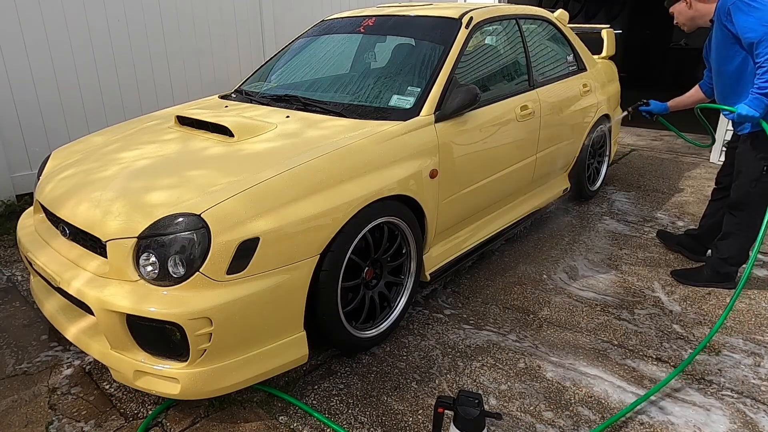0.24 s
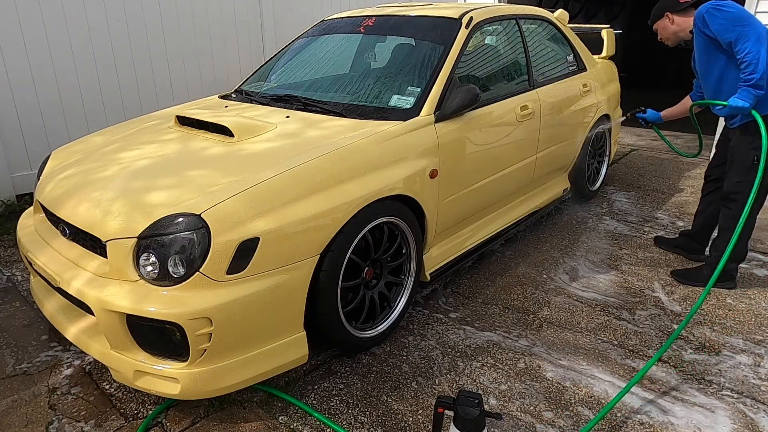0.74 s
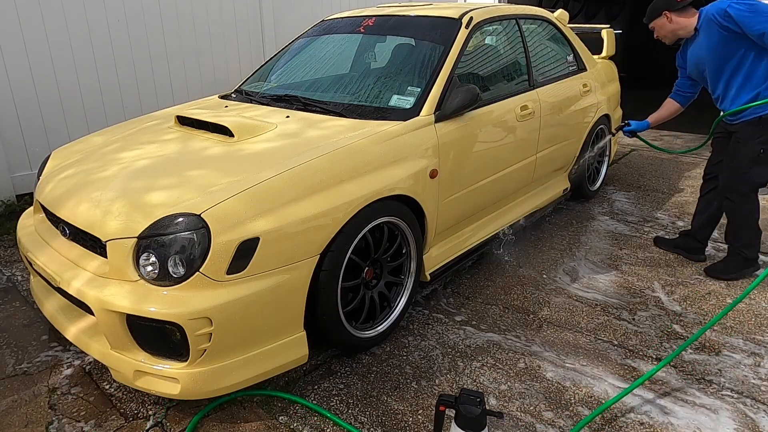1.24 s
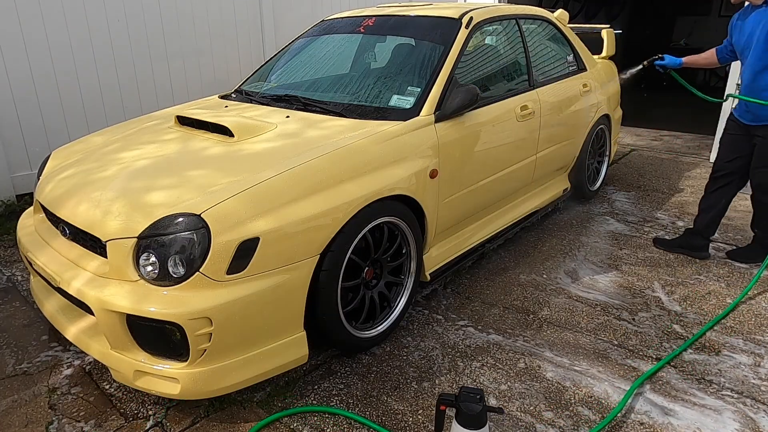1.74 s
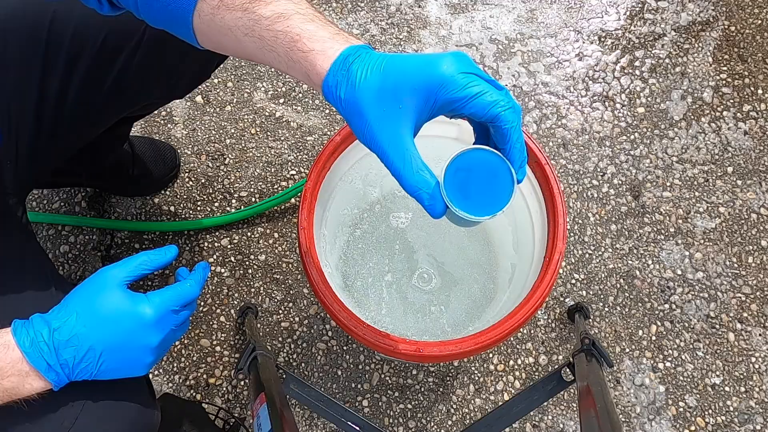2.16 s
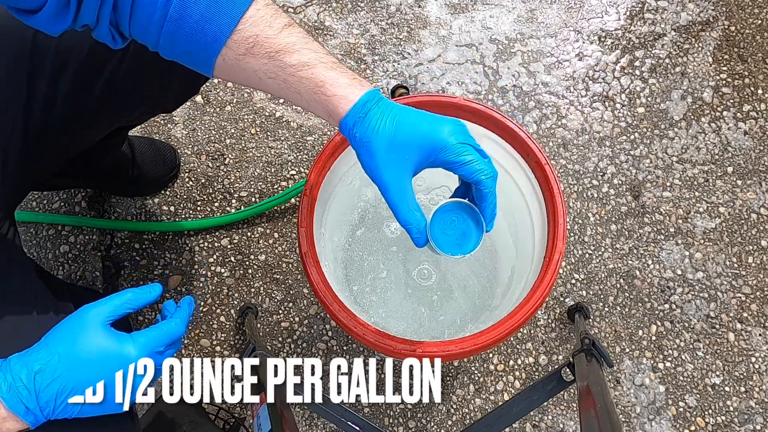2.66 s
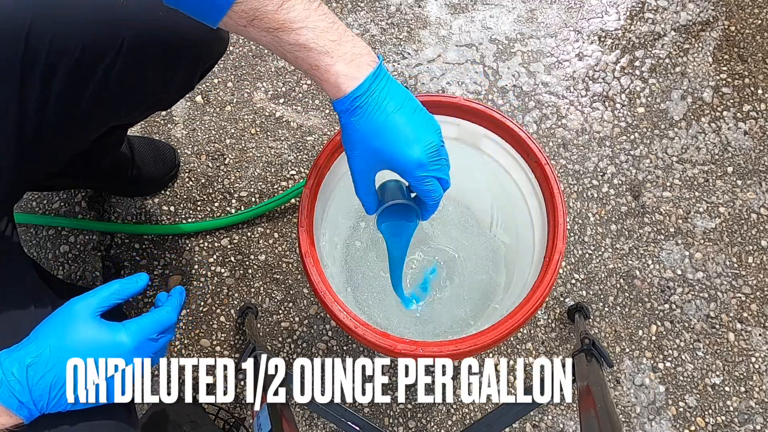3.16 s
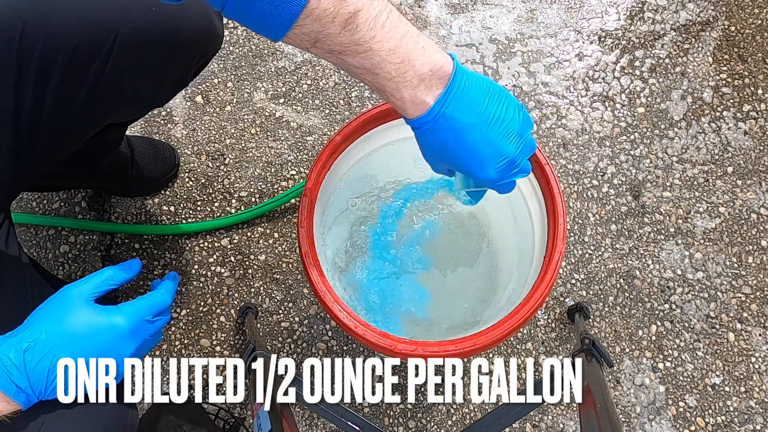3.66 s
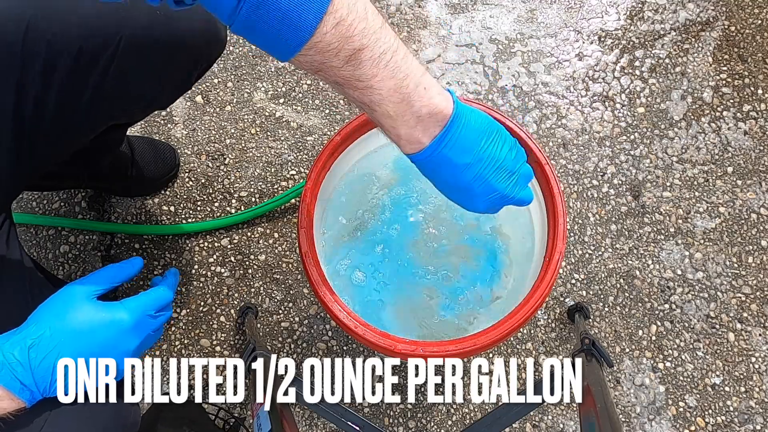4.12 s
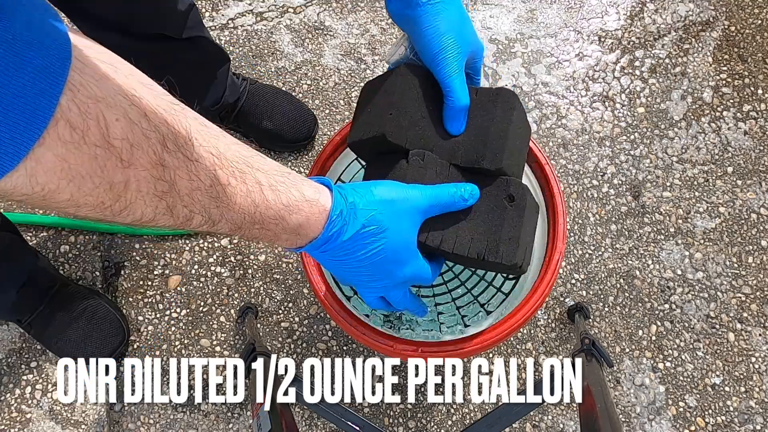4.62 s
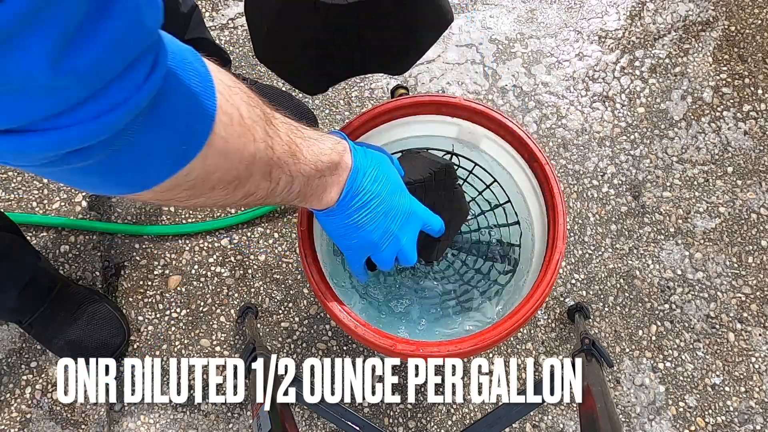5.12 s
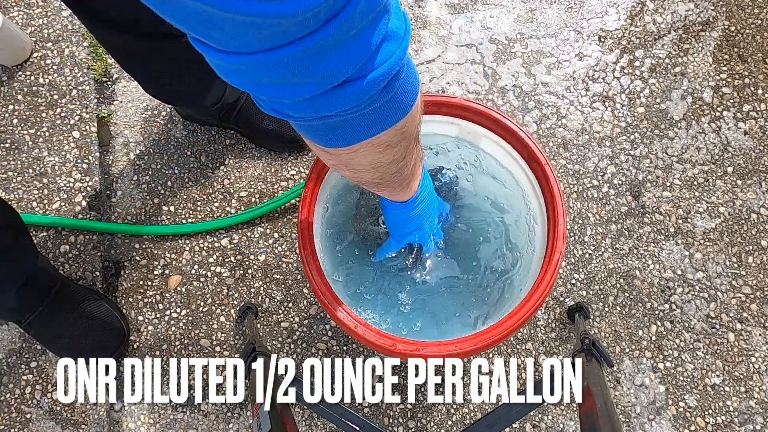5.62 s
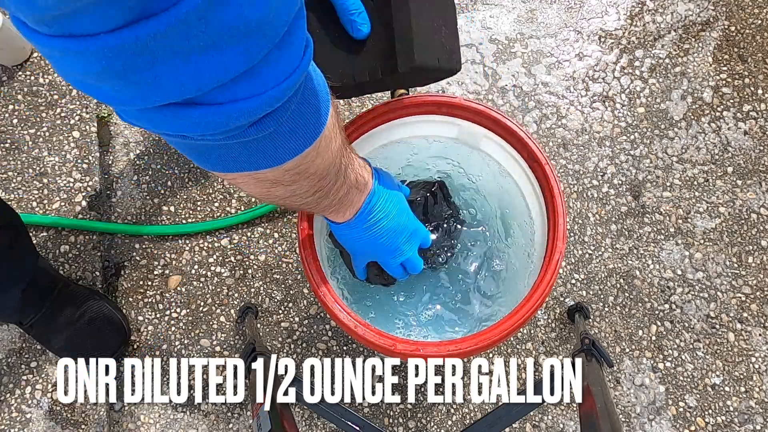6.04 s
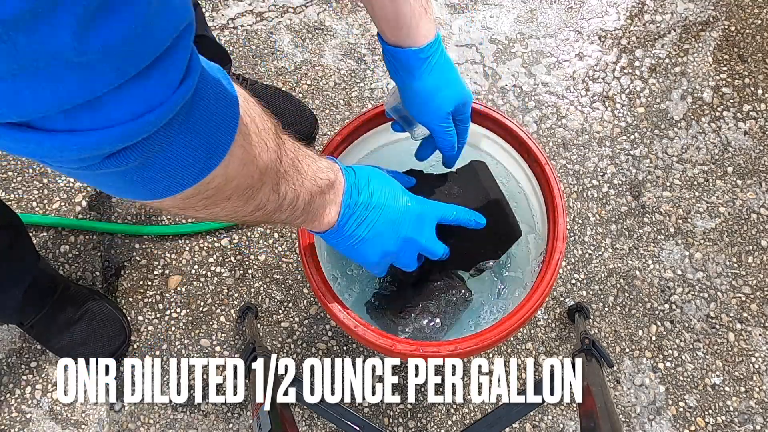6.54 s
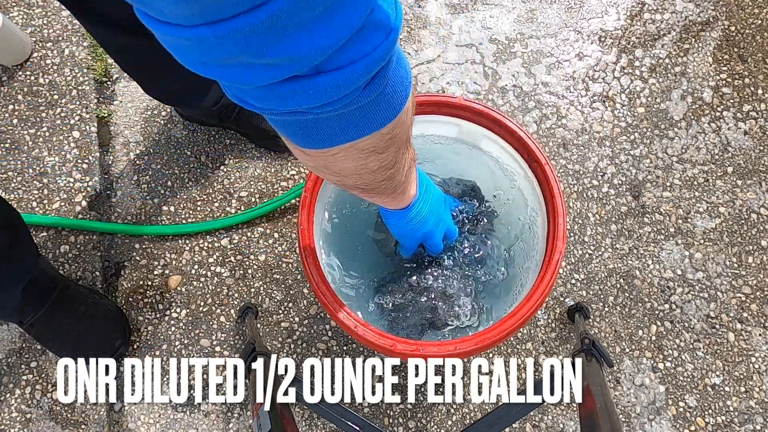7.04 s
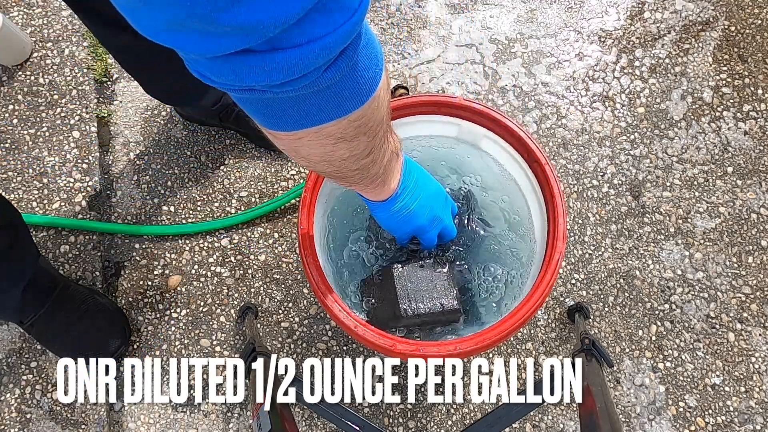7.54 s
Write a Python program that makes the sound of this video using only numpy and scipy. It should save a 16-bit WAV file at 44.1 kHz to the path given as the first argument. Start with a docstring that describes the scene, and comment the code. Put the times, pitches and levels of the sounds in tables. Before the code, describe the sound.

Loud water spray spatters over car panels for two seconds, then near-silence with small plops, a wet plastic rattle and faint frothy swishes.

```python
"""A garden hose rinses a car: the jet is coloured noise, with random drops that drum and spatter on panels.
The scene cuts to a plastic bucket in quiet outdoor air: gliding sine bubbles and noise pour in the soap.
Foam sponges plunge in as noise bursts while a plastic grid knocks, struck noise ringing its modes.
A faint breath-like hiss swells with rough narrow bands of noise; worked sponges froth and slosh.
Thin whistles sound between the sponge strokes, suds tick at random; filtered noise is the air throughout."""
import sys
import numpy as np
from scipy import signal
from scipy.fft import rfft, irfft, next_fast_len
from scipy.io import wavfile
from scipy.ndimage import map_coordinates

SR = 44100
rng = np.random.default_rng(int(sys.argv[2]) if len(sys.argv) > 2 else 0)


def generate_wav(sig):
    """Save sig (samples, or channels by samples) to the path in sys.argv[1] as 16-bit PCM at SR."""
    pcm = np.round(np.clip(np.atleast_2d(sig).T, -1, 1) * 32767).astype(np.int16)
    wavfile.write(sys.argv[1], SR, pcm)


N = 343096
TIME = np.arange(N) / SR

# open air, tone of the middle: (frequency [Hz], relative density [dB])
AIR_TONE = [(20, -7.5), (37, -6.5), (100, -2), (183, -7), (340, -10.5), (919, -9), (1410, -17.5),
            (2600, -31.5), (6050, -32), (15500, -34.5)]
# open air, left-right difference against the middle: (frequency [Hz], gain [dB])
AIR_WIDTH_TONE = [(25, -16), (1200, -34)]
# where the jet points: (time [s], aim [0 down at the wheel .. 1 up along the body])
JET_AIM = [(0, 0.29), (.7, 0.43), (1.3, 0.37), (1.7, 0.69), (2.2, 0.98)]
# strength of the jet's hiss before its wobble: (time [s], level [dB])
JET_HISS_LEVEL = [(0.0, -42), (0.7, -42.5), (1.08, -41.5), (1.5, -41.5), (1.58, -43), (2.16, -42.5)]
# hiss with the jet on the wheel: (frequency [Hz], relative density [dB])
WHEEL_HISS_TONE = [(1900, -27), (2350, -0.5), (2750, 3), (3250, -7.5), (4200, -15.5), (5300, -13.5),
                   (6200, -3.5), (7200, 0.5), (9000, -5.5), (11500, -3.5), (16000, -13)]
# hiss with the jet on the body: (frequency [Hz], relative density [dB])
BODY_HISS_TONE = [(1200, -50), (1900, -2), (2600, 3.5), (3400, 1), (7000, -5.5), (9000, -5.5),
                  (16000, -8.5)]
# band weakened by the reflection off the car: (time [s], centre [Hz])
REFLECTION_NOTCH = [(0, 5740), (1.15, 3830), (1.6, 8000), (2.17, 10600)]
# the jet crosses a panel, louder: (time [s], length [s], drumming level [dB], spatter level [dB])
PANEL_SURGES = [(0.0, 0.058, -55, -62), (0.637, 0.11, -52, -48), (0.786, 0.07, -52, -49),
                (0.976, 0.11, -48.5, -53), (1.195, 0.12, -48.5, -52.5), (1.454, 0.11, -80, -46.5),
                (1.642, .06, -47.5, -50), (1.77, 0.1, -50.5, -67)]
# the jet slips off the panel: (time [s], length [s], deepest loss of drumming [dB])
PANEL_LULLS = [(0.573, 0.045, 2), (.745, 0.031, 2), (0.886, 0.08, 0), (1.39, .23, 4.5)]
# drumming drops: (frequency [Hz], relative density [dB])
DRUM_TONE = [(70, -24), (130, -11.5), (250, -0.5), (400, -3.5), (750, 2), (1000, -1.5), (1600, -27)]
# hollow of the wheel arch and panels: (frequency [Hz], ring t60 [s], level [dB])
PANEL_MODES = [(400, 0.093, -18), (519, 0.08, -30)]
# spattering drops: (frequency [Hz], relative density [dB])
SPATTER_TONE = [(450, -22.5), (800, -17), (1150, -11.5), (1450, -7.5), (1950, -13.5), (2600, -15.5),
                (4000, -28)]
# thin sheet high on the body: (frequency [Hz], ring t60 [s], level [dB])
SHEET_MODES = [(1140, 0.011, -11.5)]
# slugs of water hitting the car: (time [s], peak [dB], centre [Hz])
WATER_SLAPS = [(.198, -31.5, 2450), (.694, -38.5, 306), (.729, -41.5, 447), (.762, -34, 2740),
               (1.506, -30, 2720), (1.685, -36, 1970)]
# the jet grazes an edge and sizzles at one pitch: (time [s], length [s], level [dB], centre [Hz])
EDGE_SIZZLES = [(.265, 0.042, -47, 2660), (.62, 0.11, -46.5, 7100), (.93, 0.28, -54.5, 12300),
                (1.31, 0.054, -47.5, 9200), (1.665, 0.046, -45, 2580), (1.72, 0.22, -52.5, 12500)]
# the jet dwells on a panel, which booms: (time [s], length [s], level [dB], centre [Hz])
PANEL_BOOMS = [(.46, 0.12, -55.5, 590), (.798, 0.011, -40.5, 810), (.815, 0.025, -41, 558),
               (1.0, 0.075, -48, 411), (1.01, 0.06, -46, 720), (1.79, 0.062, -50.5, 684),
               (1.92, 0.12, -50.5, 1070), (2.05, 0.094, -49, 1225)]

# air column and wall of the bucket: (frequency [Hz], ring t60 [s], level [dB])
BUCKET_MODES = [(754, 0.15, -31)]
# single bubbles that stand out, low and high: (time [s], peak [dB], starting pitch [Hz])
SINGLE_BUBBLES = [(3.052, -57, 1213), (3.103, -55, 2660), (3.114, -57, 1280), (3.182, -51, 1790),
                  (3.196, -53.5, 895), (3.269, -50, 5620), (3.377, -60.5, 1040), (3.417, -53, 910),
                  (3.452, -56, 1880), (3.752, -41.5, 920), (3.838, -51.5, 1310), (3.911, -55.5, 1660),
                  (3.922, -62, 2540), (4.421, -53, 511), (4.703, -49, 955), (4.715, -55, 995),
                  (5.208, -53, 566), (5.267, -55.5, 620), (5.287, -42, 232), (5.848, -55.5, 1002),
                  (6.58, -55, 1245), (6.599, -48.5, 990), (6.7, -56, 1023), (6.917, -49.5, 3280),
                  (6.951, -62, 2280), (7.538, -53.5, 3930), (7.712, -55.5, 3870), (7.73, -62, 3140)]
# drops and suds snap on the surface: (time [s], peak [dB], centre [Hz])
SURFACE_POPS = [(3.053, -58.5, 4030), (3.285, -56, 4660), (3.321, -58, 4870), (3.338, -57, 6800),
                (3.521, -55.5, 5300), (3.599, -51, 7100), (3.644, -52, 4220), (3.783, -50.5, 3700),
                (3.818, -50, 7950), (4.417, -52.5, 5660), (4.56, -46, 3000), (4.595, -38, 2900),
                (4.635, -45.5, 6030), (5.432, -56, 2840), (5.892, -51.5, 4550), (5.902, -50.5, 3380),
                (5.997, -68, 3030), (6.353, -57, 3530), (6.36, -51.5, 2850), (6.474, -63, 2800),
                (6.485, -59, 2050), (6.497, -65, 1530), (6.579, -59, 10000), (6.821, -52, 7100),
                (6.861, -43, 3260), (6.872, -50, 3270), (6.881, -45.5, 2550), (7.123, -52.5, 8050),
                (7.266, -55.5, 9000)]
# an open cavity closes with a quick upward gurgle: (time [s], peak [dB], starting pitch [Hz])
CAVITY_GURGLES = [(3.066, -52.5, 1620), (3.14, -59, 2100), (3.493, -54, 1610), (3.781, -49, 1190),
                  (5.653, -67.5, 2390), (5.825, -62.5, 1910)]
# soap runs in, then the cup is dipped: (time [s], length [s], fine fizz level [dB], burble level [dB])
SOAP_POURS = [(3.082, 0.023, -67, -66.5), (3.155, 0.05, -78, -75), (3.25, 0.17, -76, -82),
              (3.427, 0.12, -73, -72.5), (3.56, 0.042, -73, -69), (3.663, 0.14, -75.5, -73.5),
              (3.761, 0.09, -71, -71)]
# fine fizz of the pour: (frequency [Hz], relative density [dB])
FIZZ_TONE = [(1500, -18), (5000, 5.5), (10000, 2), (16000, -2)]
# a sponge slaps the water: (time [s], thud peak [dB], thud centre [Hz], spray peak [dB], decay [s])
SPONGE_PLUNGES = [(4.422, -55.5, 710, -61, 0.03), (4.537, -51, 1500, -53, 0.026),
                  (4.579, -42.5, 620, -50.5, 0.027), (4.595, -37.5, 930, -46, 0.008),
                  (5.206, -53, 1570, -56, 0.0092), (5.291, -46, 335, -84, 0.014),
                  (5.974, -55.5, 1250, -76, 0.0032), (6.333, -58, 214, -65, 0.007),
                  (6.651, -53.5, 844, -48, 0.0048), (6.856, -46, 370, -49, 0.0068),
                  (6.978, -52.5, 393, -79, 0.0022), (7.041, -52.5, 395, -71, 0.0024),
                  (7.37, -53, 706, -84, 0.0011)]
# the hand works a sponge under water: (time [s], length [s], froth level [dB], slosh level [dB])
SPONGE_STROKES = [(4.568, 0.087, -62.5, -58), (5.19, 0.17, -80, -67.5), (5.796, 0.16, -76, -73.5),
                  (5.982, 0.022, -68, -64), (6.06, 0.48, -80, -74.5), (6.334, 0.02, -64.5, -66),
                  (6.456, 0.025, -71, -61.5), (6.52, 0.24, -74.5, -74.5), (6.826, 0.21, -71.5, -70),
                  (7.277, 0.11, -102, -71)]
# froth of the worked sponge: (frequency [Hz], relative density [dB])
FROTH_TONE = [(1500, -5), (3200, 2.5), (4500, -4), (10000, -1.5), (16000, -11)]
# slosh of the worked sponge: (frequency [Hz], relative density [dB])
SLOSH_TONE = [(110, -18), (300, 0.5), (800, -1), (1400, -4), (3000, -22)]
# the plastic grid knocks against the bucket: (time [s], peak [dB])
GRID_KNOCKS = [(4.599, -38), (4.661, -41), (4.685, -45.5), (4.768, -46), (4.785, -51.5)]
# chatter where the grid touches: (frequency [Hz], relative density [dB])
KNOCK_TONE = [(350, 9), (800, -0.5), (1900, -4.5), (2500, -15.5), (7000, -17.5)]
# the grid's ringing, before each knock detunes it: (frequency [Hz], ring t60 [s], level [dB])
GRID_MODES = [(830, .03, -22), (980, 0.02, -13), (1270, 0.04, -9), (1630, 0.038, -13), (2030, 0.027, -23),
              (3110, 0.042, -23)]
# a faint breath-like hiss: (time [s], length [s], level [dB])
FAINT_BREATH = [(4.92, 0.32, -74.5)]
# colour of the breath-like hiss: (frequency [Hz], relative density [dB])
FAINT_BREATH_TONE = [(1500, -16), (2300, 2), (6600, -6), (12000, -8), (16000, -17)]
# faint rough bands within and after that hiss: (time [s], length [s], level [dB], centre [Hz])
ROUGH_BANDS = [(5.048, 0.12, -77.5, 4010), (5.215, 0.15, -76, 2800)]
# thin, faint, unsteady whistles: (time [s], length [s], level [dB], centre [Hz])
FAINT_WHISTLES = [(5.39, 0.15, -86.5, 6330), (5.625, 0.065, -81, 3610), (5.77, 0.26, -87, 3540)]
# suds burst at random on the foamy water: (time [s], length [s], rms level [dB])
BURSTING_SUDS = [(5.4, 2.4, -84.5)]
# ticks of the suds: (frequency [Hz], relative density [dB])
SUDS_TONE = [(3500, -6), (8000, -1), (12000, -5), (16000, -17)]


def from_db(db):
    """Decibels to gain."""
    return 10 ** (np.asarray(db) / 20)


def rms_one(x):
    """Scale to unit power."""
    return x / np.sqrt(np.mean(x ** 2) + 1e-20)


def noise():
    """White noise for the whole length."""
    return rng.standard_normal(N)


def curve(rows):
    """A (time, value) curve at every sample."""
    s, value = np.transpose(rows)
    return np.interp(TIME, s, value)


def add(track, s, sound):
    """Mix a short sound in at time s."""
    start = max(round(s * SR), 0)
    track[start:start + len(sound)] += sound[:N - start]


def coloured(x, spectrum):
    """Filter by a spectrum that falls 20 dB per octave beyond its ends."""
    hz, db = np.transpose(spectrum)
    size = next_fast_len(N)
    octave = np.log2(np.maximum(np.arange(size // 2 + 1) * SR / size, 1))
    known = np.log2(hz)
    beyond = np.abs(octave - np.clip(octave, known[0], known[-1]))
    gain = from_db(np.interp(octave, known, db) - 20 * beyond)
    return irfft(rfft(x, size) * gain, size)[:N]


def drift(per_s):
    """Smooth chance with spread 1, turning about per_s times a second."""
    knots = rng.standard_normal(4096)
    return rms_one(map_coordinates(knots, [TIME * per_s], order=2, mode="wrap"))


def drops(per_s, spread_db):
    """Random impacts of uneven size and either sign, at unit power."""
    sizes = from_db(spread_db * np.minimum(rng.exponential(1, N), 4))
    return rms_one((rng.random(N) < per_s / SR) * sizes * rng.choice([-1, 1], N))


def resonate(x, modes):
    """A sound plus the damped ringing that it excites in a body."""
    out = x.copy()
    for hz, t60, db in modes:
        r = np.exp(-np.log(1000) / (t60 * SR))
        w = 2 * np.pi * hz / SR
        ring = signal.lfilter([1, -r * np.cos(w)], [1, -2 * r * np.cos(w), r * r], x + 1e-18)
        out += from_db(db) * w * ring
    return out


def swells(rows, attack_s, release_s):
    """Gain over time: each event (time, length, dB) rises, holds and dies away; powers add."""
    power = np.zeros(N)
    for s, length, db in rows:
        rise = np.clip((TIME - s) / attack_s, 0, 1)
        fall = np.exp(-np.clip((TIME - s - length) / release_s, 0, 20))
        power += (from_db(db) * rise * fall) ** 2
    return np.sqrt(power)


def in_band(x, hz, width):
    """Keep a band around a centre pitch; width is the upper half as a share of that pitch."""
    edges = [hz / (1 + width), hz * (1 + width)]
    return signal.sosfilt(signal.butter(2, edges, "band", fs=SR, output="sos"), x)


def bursts(rows, width, onset_s):
    """Impacts (time, peak dB, Hz, decay): a quick rise and a dying rush of band noise."""
    out, t = np.zeros(N), TIME[:SR // 4]
    for s, db, hz, decay in rows:
        envelope = (1 - np.exp(-t / onset_s)) * np.exp(-t / decay)
        rush = in_band(rng.standard_normal(len(t)) * envelope, hz, width)
        add(out, s, from_db(db) * rush / np.abs(rush).max())
    return out


def singing(rows, width, attack_s, release_s):
    """Events (time, length, dB, Hz): noise that swells in a band around each pitch."""
    out = np.zeros(N)
    for s, length, db, hz in rows:
        out += rms_one(in_band(noise(), hz, width)) * swells([(s, length, db)], attack_s, release_s)
    return out


def decay_at(hz, decay_s, slope):
    """Decay time at a pitch, from that at 1 kHz: higher sounds die sooner by a power of pitch."""
    return decay_s * (hz / 1000) ** -slope


def outdoors():
    """A soft distant rumble with a faint hiss: coloured noise, nearly all in the middle."""
    mid = rms_one(coloured(noise(), AIR_TONE))
    side = coloured(rms_one(coloured(noise(), AIR_TONE)), AIR_WIDTH_TONE)
    return from_db(-67.5) * (mid + side * [[1], [-1]])


def hose():
    """The moving jet hisses, drums and spatters; slaps, sizzles and booms stand out."""
    aim = np.clip(curve(JET_AIM), 0, 1)
    lull_db = sum(db * np.exp(-(2 * (TIME - s) / length - 1) ** 4) for s, length, db in PANEL_LULLS)
    lull = from_db(-lull_db)
    return jet_hiss(aim) + drumming(aim, lull) + spatter(aim, lull) + slaps() + sizzles() + booms()


def jet_hiss(aim):
    """Fine drops and noise, blended from wheel to body colour by the aim, then echoed and shaded."""
    mist = drops(per_s=7000, spread_db=3.5) + 0.79 * noise()
    at_wheel = rms_one(coloured(mist, WHEEL_HISS_TONE))
    at_body = rms_one(coloured(mist, BODY_HISS_TONE))
    hiss = (1 - aim) * at_wheel + aim * at_body
    hiss = hiss * from_db(curve(JET_HISS_LEVEL) + 0.5 * drift(per_s=34))
    hiss = reflected(hiss, count=8, echo_db=-16, longest_s=0.011, sway_s=0.000162)
    return shaded(hiss, patchy_db=1.4, notch_db=-2.5, notch_octaves=0.31)


def reflected(x, count, echo_db, longest_s, sway_s):
    """Echoes from bodywork, wall and wet ground; paths shift as the nozzle moves, so the hiss shimmers."""
    out, gain = x.copy(), from_db(echo_db)
    lags = np.linspace(longest_s / count, longest_s, count) * rng.uniform(0.8, 1.2, count)
    for lag in lags:
        path = lag + sway_s * drift(per_s=2.5)
        out += gain * map_coordinates(x, [(TIME - path) * SR], order=2)
    return out / np.sqrt(1 + count * gain ** 2)


def shaded(x, patchy_db, notch_db, notch_octaves):
    """The car's reflection weakens a moving band; other bands flare and fade as the jet fans out."""
    hz, s, cells = signal.stft(x, SR, nperseg=512)
    octave = np.log2(np.maximum(hz, 100))[:, None]
    centre = np.log2(np.interp(s, *np.transpose(REFLECTION_NOTCH)))
    notch = np.exp(-((octave - centre) / notch_octaves) ** 2)
    # four random patches an octave, eleven a second
    where = np.broadcast_arrays(4 * octave, 11 * s)
    patches = map_coordinates(rng.standard_normal((64, 64)), where, order=2, mode="wrap")
    return signal.istft(cells * from_db(notch_db * notch + patchy_db * patches), SR)[1][:N]


def surge_gain(rows):
    """Swelling gain as the jet crosses each panel."""
    return swells(rows, attack_s=0.024, release_s=0.012)


def drumming(aim, lull):
    """Heavy drops excite the hollow panels; surges add to a steady level that drops with the aim."""
    drum = resonate(coloured(drops(per_s=2300, spread_db=2), DRUM_TONE), PANEL_MODES)
    surge = surge_gain([(s, length, db) for s, length, db, _ in PANEL_SURGES])
    steady = from_db(-48 - 5.5 * aim)
    return rms_one(lull * drum) * np.hypot(steady, surge) * from_db(0.59 * drift(per_s=40))


def spatter(aim, lull):
    """Brighter drops that ring a thin sheet as the aim rises; lulls take half their dB off the steady part."""
    plain = rms_one(coloured(drops(per_s=3500, spread_db=2.8), SPATTER_TONE))
    sheet = rms_one(resonate(plain, SHEET_MODES))
    surge = surge_gain([(s, length, db) for s, length, _, db in PANEL_SURGES])
    steady = np.sqrt(lull) * from_db(-52 + 3 * aim)
    return ((1 - aim) * plain + aim * sheet) * np.hypot(steady, surge) * from_db(drift(per_s=50))


def slaps():
    """Slugs of water burst on the car as short band noise."""
    rows = [(s, db, hz, decay_at(hz, decay_s=0.015, slope=0.16)) for s, db, hz in WATER_SLAPS]
    return bursts(rows, width=0.26, onset_s=0.00015)


def sizzles():
    """The jet grazing an edge makes a swelling band of noise."""
    return singing(EDGE_SIZZLES, width=0.23, attack_s=0.021, release_s=0.012)


def booms():
    """A panel under the dwelling jet booms as a narrow band of noise."""
    return singing(PANEL_BOOMS, width=0.064, attack_s=0.0063, release_s=0.012)


def bucket():
    """Water sounds and the breath-like hiss ring the bucket; bubbles, gurgles and knocks lie over them."""
    ringing = resonate(pops() + pour() + plunges() + strokes() + faint_breath() + suds(), BUCKET_MODES)
    inside = bubbles() + gurgles() + ringing + knocks()
    return surroundings(inside, echo_db=-9, decay_s=0.0072)


def surroundings(x, echo_db, decay_s):
    """Early scatter from the bucket wall and the ground, gone quickly in the open air."""
    t = TIME[:SR // 5]
    echoes = rng.standard_normal(len(t)) * np.exp(-t / decay_s) * (t > 0.002)
    return x + from_db(echo_db) * signal.fftconvolve(x, echoes / np.linalg.norm(echoes))[:N]


def bubble(hz, decay, glide, swell):
    """A bubble swells and rings out as a sine gliding by glide octaves per decay time."""
    age = TIME[:int(10 * decay * SR) + 2] / decay
    pitch = hz * 2 ** (glide * np.minimum(age, 5))
    level = age ** swell * np.exp(-age)
    return level / level.max() * np.sin(2 * np.pi * np.cumsum(pitch) / SR)


def bubbles():
    """Single bubbles that stand out: those above 1250 Hz chirp up, those below sag."""
    out = np.zeros(N)
    for s, db, hz in SINGLE_BUBBLES:
        glide = 0.053 * np.tanh(2 * np.log2(hz / 1250))
        decay = decay_at(hz, decay_s=0.0063, slope=0.61)
        add(out, s, from_db(db) * bubble(hz, decay, glide, swell=0.21))
    return out


def pops():
    """Drops and suds snap as tiny bursts of band noise."""
    return bursts([(s, db, hz, 0.0018) for s, db, hz in SURFACE_POPS], width=0.28, onset_s=0.0011)


def gurgles():
    """A closing cavity is a short sine that glides quickly upward."""
    out = np.zeros(N)
    for s, db, hz in CAVITY_GURGLES:
        add(out, s, from_db(db) * bubble(hz, decay=0.0022, glide=0.132, swell=1))
    return out


def swarm(count, low_hz, high_hz, cycles, spread_db, glide):
    """Bubbles at random moments and pitches; small ones die sooner, and each glides its own way."""
    out = np.zeros(N)
    for when, size, loud, life, rise in rng.random((count, 5)):
        hz = low_hz * (high_hz / low_hz) ** size
        decay = cycles * (0.5 + life) / hz * (hz / low_hz) ** 0.25
        ring = bubble(hz, decay, glide * (2 * rise - 0.5), swell=0.44)
        add(out, when * TIME[-1], from_db(spread_db * loud ** 2) * (hz / low_hz) ** 0.5 * ring)
    return rms_one(out)


def small_bubbles():
    """A dense swarm of small, high bubbles."""
    return swarm(count=6000, low_hz=1257, high_hz=11500, cycles=4.5, spread_db=9, glide=0.05)


def pour():
    """A thin stream entrains ringing bubbles: clumps of fine fizz over a coarser burble."""
    # the noise stands for bubbles too fine and many to tell apart
    clumps = (small_bubbles() + 0.225 * noise()) * from_db(2.8 * drift(per_s=60))
    fizz = rms_one(coloured(clumps, FIZZ_TONE))
    burble = swarm(count=5000, low_hz=1400, high_hz=3300, cycles=7, spread_db=8, glide=0.03)
    fizz_rows = [(s, length, db) for s, length, db, _ in SOAP_POURS]
    burble_rows = [(s, length, db) for s, length, _, db in SOAP_POURS]
    return (fizz * swells(fizz_rows, attack_s=0.012, release_s=0.023)
            + burble * swells(burble_rows, attack_s=0.012, release_s=0.023))


def plunges():
    """Each plunge is a thud, a low thump of the mass of water and a bright spray of band noise."""
    thump_hz = 147
    thuds, thumps, sprays = [], [], []
    for s, db, hz, spray_db, decay in SPONGE_PLUNGES:
        thuds.append((s, db, hz, decay))
        # the lower the thud, the stronger its thump
        thumps.append((s, db - 4 + 20 * np.log10(thump_hz / hz), thump_hz, 0.015))
        sprays.append((s, spray_db, 4620, decay))
    return (bursts(thuds, width=0.38, onset_s=0.0005)
            + bursts(thumps, width=0.28, onset_s=0.0018)
            + bursts(sprays, width=1.6, onset_s=0.001))


def strokes():
    """A worked sponge froths with crackle and small bubbles, and sloshes with lower ones."""
    crackle = drops(per_s=1100, spread_db=9.5)
    foam = 0.6 * crackle + 1.2 * small_bubbles() + 0.45 * noise()
    froth = rms_one(coloured(foam * from_db(3 * drift(per_s=60)), FROTH_TONE))
    low_bubbles = swarm(count=2200, low_hz=211.5, high_hz=1990, cycles=1.74, spread_db=11, glide=0.076)
    slosh = rms_one(coloured(low_bubbles, SLOSH_TONE))
    froth_rows = [(s, length, db) for s, length, db, _ in SPONGE_STROKES]
    slosh_rows = [(s, length, db) for s, length, _, db in SPONGE_STROKES]
    return (froth * swells(froth_rows, attack_s=0.012, release_s=0.027)
            + slosh * swells(slosh_rows, attack_s=0.012, release_s=0.027))


def knocks():
    """Wet plastic chatters, then rattles; the grid rings differently wherever it is struck."""
    contact = coloured(noise(), KNOCK_TONE) * from_db(5 * drift(per_s=400))
    out, t = np.zeros(N), TIME[:SR // 5]
    for s, db in GRID_KNOCKS:
        modes = [(hz * (1 + 0.05 * rng.standard_normal()), t60, level) for hz, t60, level in GRID_MODES]
        rise_s = 0.0004 * from_db(-38 - db) ** 2   # gentle knocks build up more slowly
        chatter, rattle = np.exp(-t / 0.0055), from_db(-16) * np.exp(-t / 0.022)
        force = (1 - np.exp(-t / rise_s)) * (chatter + rattle)
        ring = resonate(contact[int(s * SR):][:len(t)] * force, modes)
        add(out, s, from_db(db) * ring / np.abs(ring).max())
    return out


def faint_breath():
    """A faint breath-like hiss: a slow swell of coloured noise."""
    hiss = rms_one(coloured(noise(), FAINT_BREATH_TONE))
    return hiss * swells(FAINT_BREATH, attack_s=0.16, release_s=0.037)


def rough_bands():
    """Faint rough narrow bands of noise within and after the breath-like hiss."""
    return singing(ROUGH_BANDS, width=0.054, attack_s=0.02, release_s=0.02)


def whistles():
    """Very narrow bands of noise make thin, unsteady whistles."""
    return singing(FAINT_WHISTLES, width=0.022, attack_s=0.02, release_s=0.02)


def suds():
    """Bursting suds are sparse random ticks."""
    ticks = rms_one(coloured(drops(per_s=66, spread_db=3), SUDS_TONE))
    return ticks * swells(BURSTING_SUDS, attack_s=0.77, release_s=0.3)


def scene():
    """The hose until the cut, then the bucket; open air throughout."""
    cut_s, fade_s = 2.174, 0.00095
    before_cut = np.clip((cut_s - TIME) / fade_s, 0, 1)
    return outdoors() + hose() * before_cut + bucket() + rough_bands() + whistles()


def record(dry):
    """A steep elliptic low-pass takes off the top above 15.9 kHz."""
    return signal.sosfilt(signal.ellip(12, 0.1, 70, 15900, fs=SR, output="sos"), dry)


dry = scene()
out = record(dry)
generate_wav(out)
```